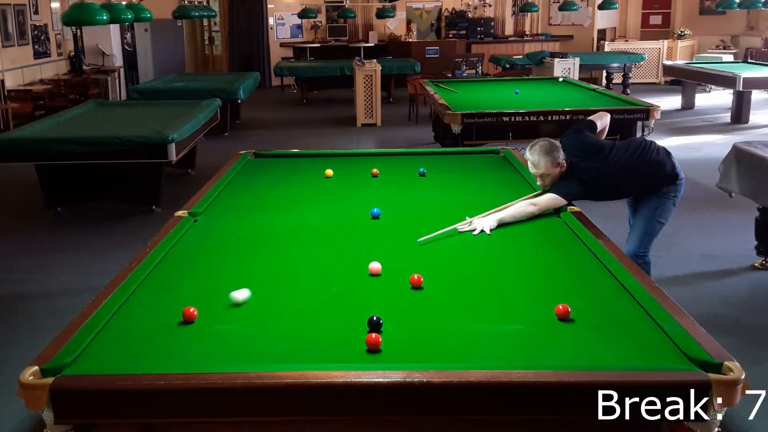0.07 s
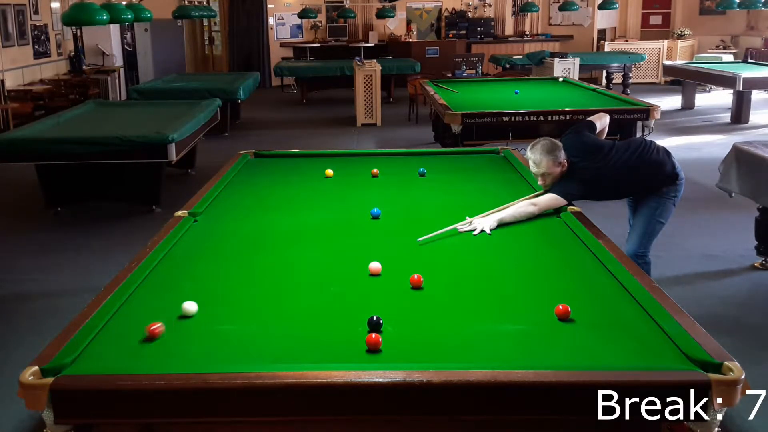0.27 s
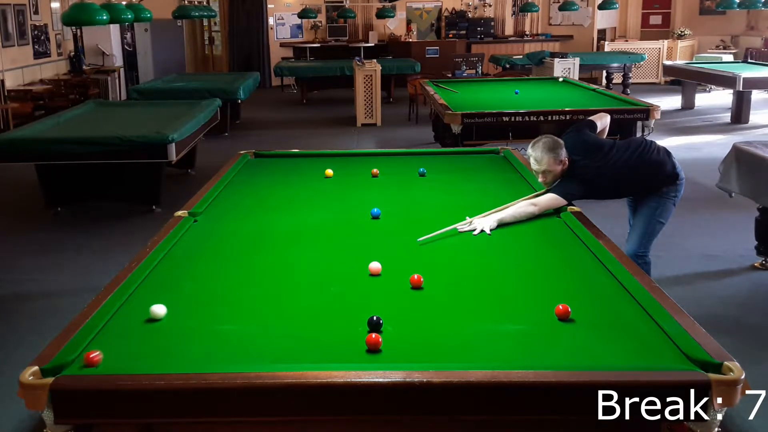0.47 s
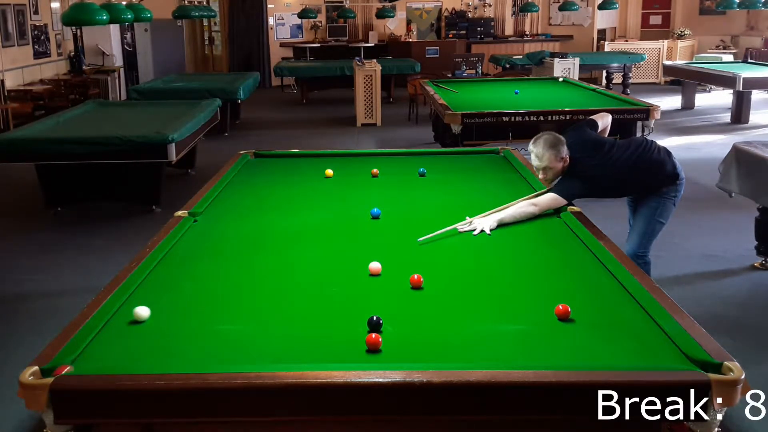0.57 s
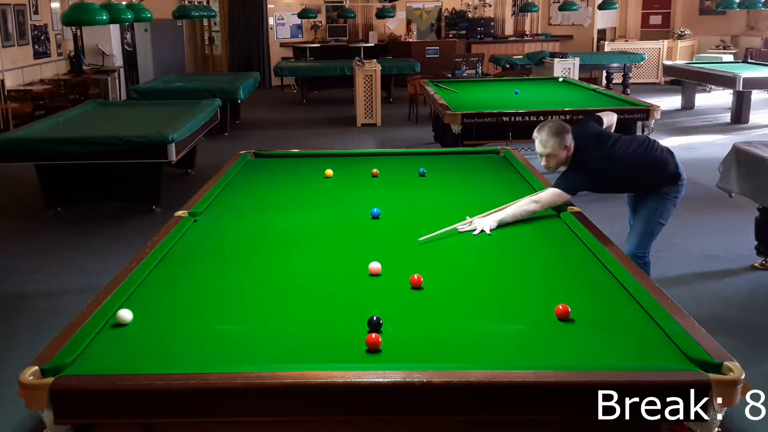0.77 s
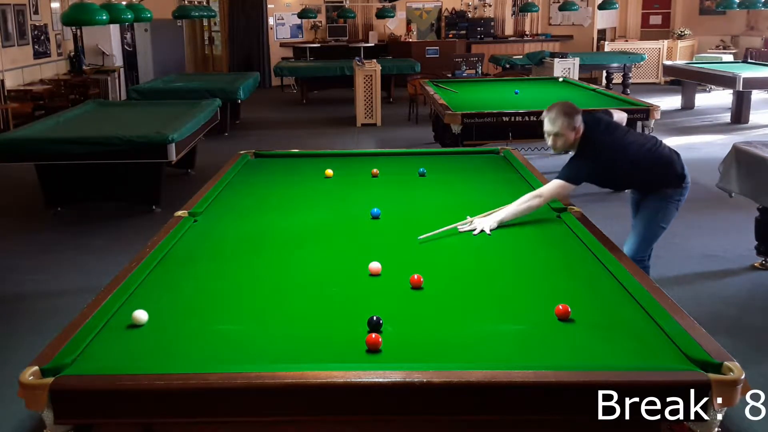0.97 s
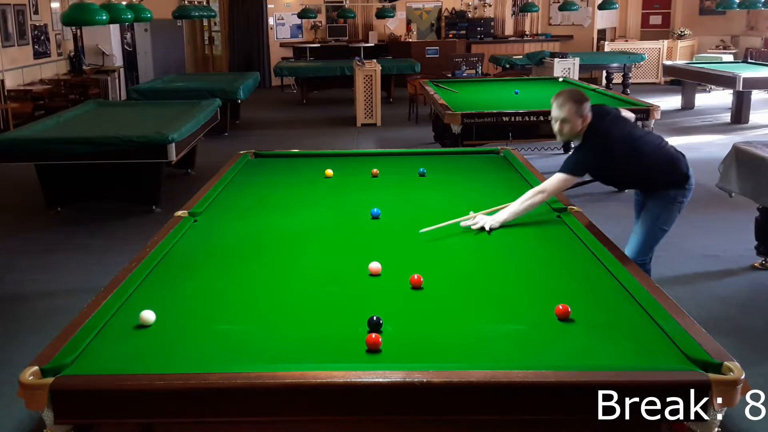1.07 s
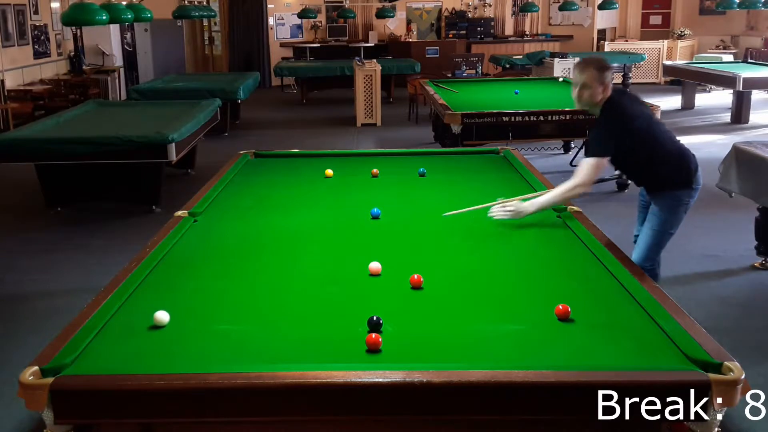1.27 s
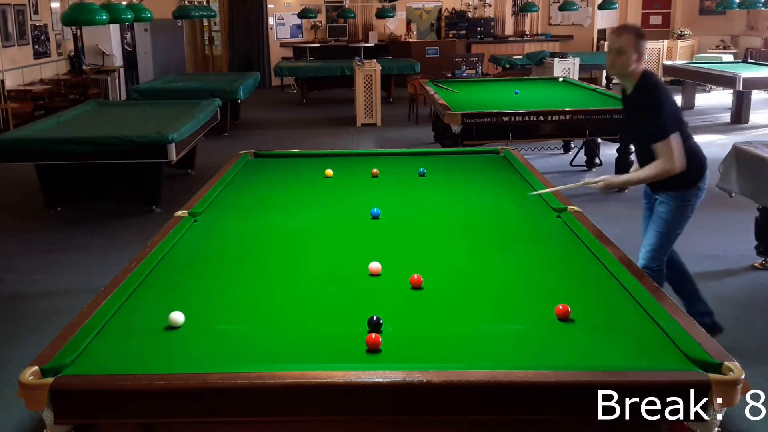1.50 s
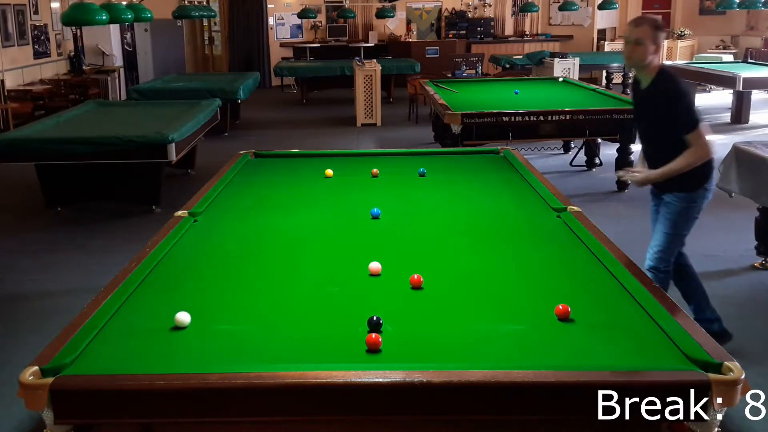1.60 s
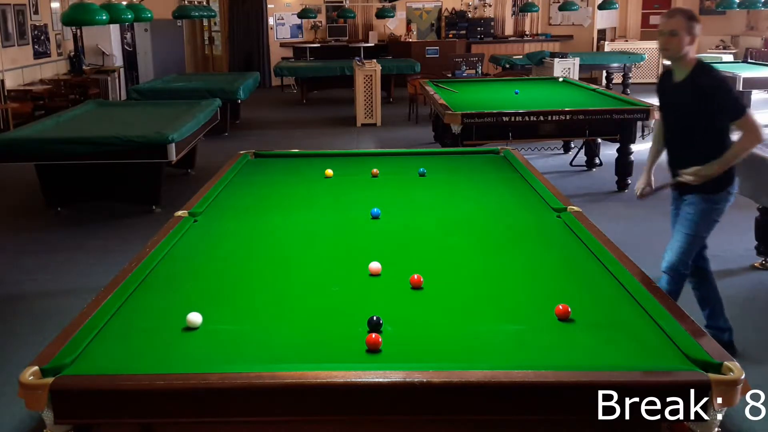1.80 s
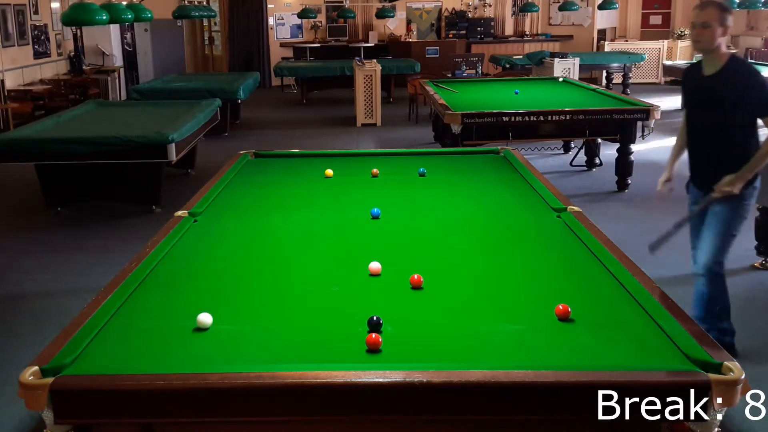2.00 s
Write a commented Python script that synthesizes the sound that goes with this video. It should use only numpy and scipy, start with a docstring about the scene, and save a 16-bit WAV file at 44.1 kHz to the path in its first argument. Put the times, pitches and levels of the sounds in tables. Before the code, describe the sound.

Two snooker balls meet with a hard click close by, echoing through a large hall. After a low rumble, one knocks into a pocket and its fittings rattle. Faint scuffs follow over light hiss and a fan.

```python
"""The fading reverberation of a cue stroke fills a large, quiet billiard hall, over air, hiss and a fan.
Heard from the foot of the snooker table, the cue ball clicks against a red; the balls rumble on the slate
and thump the bed and cushion. The red drops into the corner pocket, where the impact rattles the metal
fittings and excites the modes of the frame. Near surfaces and far walls reflect both impacts.
Last come soft scuffs as the player steps back."""
import sys
import numpy as np
from scipy import signal
from scipy.fft import rfft, irfft
from scipy.io import wavfile

SR = 44100
rng = np.random.default_rng(int(sys.argv[2]) if len(sys.argv) > 2 else 0)


def log_audio(samples):
    """Write samples as a 16-bit WAV file to the path given in sys.argv[1]."""
    # one column per channel
    frames = np.atleast_2d(samples).T
    # limit to full scale, then quantise
    limited = np.clip(frames, -1, 1)
    pcm = np.round(limited * 32767).astype(np.int16)
    wavfile.write(sys.argv[1], SR, pcm)


N = 90404

# likeness of a diffuse field at the two ears (frequency [Hz], correlation [-1 to 1])
EAR_CORRELATION = [(60, .75), (250, 0.69), (500, 0.55), (1000, 0.056), (2200, 0.11), (4000, -0.075),
                   (8000, 0.017)]
# spectra of the cue stroke's tail, the air, the hiss and the fan (frequency [Hz], density [dB])
CUE_SPECTRUM = [(90, -13), (200, -1), (350, -3.5), (750, 1.5), (1300, -4), (2500, -7.5), (3500, -17.5),
                (6000, -41)]
AIR_SPECTRUM = [(20, -3), (45, -15.5), (80, -3), (125, 2), (160, 1.5), (200, 5), (300, -7), (600, -4.5),
                (1200, -6.5), (2400, -9.5), (4000, -16.5), (8000, -39)]
HISS_SPECTRUM = [(2000, 4), (5000, -1.5), (7500, -6), (9500, -9.5), (12000, 0.5), (15500, -1)]
FAN_SPECTRUM = [(100, -7), (300, -1), (700, 0), (1300, -.5), (2400, -4), (3500, -12), (6000, -26)]
# slow drift of the hiss (time [s], level [dB])
HISS_ENVELOPE = [(0, -68.5), (.4, -66.5), (1.1, -67), (1.5, -69.5), (2.05, -71.5)]
# spectrum of the ball-on-ball click (frequency [Hz], relative level [dB])
CLICK_SPECTRUM = [(100, -40), (400, -34), (650, -24), (1000, -12), (1600, -4), (2500, 1), (3100, -5.5),
                  (4300, -20), (5500, -38.5), (9000, -47.5), (15000, -51)]
# reflections off lamp, ceiling and rails (delay [ms], gain [dB], right-ear lag [ms], left minus right [dB])
CLICK_ECHOES = [(3.5, -15, 0.15, -4), (5.1, -24, -0.21, 22), (7.5, -9, 0.42, 4), (8.53, -4.8, 0, 0),
                (10.0, -20, 0.13, -31), (11.4, -13.5, -0.053, 10)]
# colour of the hall's reverberation (frequency [Hz], relative level [dB])
HALL_SPECTRUM = [(300, 3), (1000, .5), (2200, 1.5), (3200, -0.5), (4500, 0.5), (7000, 1), (15000, 1)]
# reverberation time of the hall (frequency [Hz], T60 [s])
HALL_DECAY = [(150, 3.5), (600, 2.76), (1300, 1.87), (2200, 1.56), (3200, 1.39), (4500, 1.0), (8000, 0.51),
              (15000, 0.38)]
# rumble of balls on the slate (frequency [Hz], density [dB])
ROLL_SPECTRUM = [(40, -27), (90, -14), (125, 0), (170, -4.5), (260, -6), (500, -8.5), (1000, -34),
                 (3000, -60)]
# resonances struck in the bed and cushions (time [s], frequency [Hz], level [dB], T60 [s])
TABLE_THUMPS = [(0.326, 129, -62, 0.28), (.44, 125, -57, 0.13), (.97, 196.8, -57.5, 0.64),
                (1.275, 191, -62, 0.25)]
# spectrum of the knock in the pocket (frequency [Hz], relative level [dB])
DROP_SPECTRUM = [(100, -24), (300, -15), (600, -16), (1000, -8), (1700, -0.5), (2500, -1), (3200, -5),
                 (4200, -18), (5500, -31), (9000, -32), (15000, -40)]
# rattle of the pocket's metal fittings (frequency [Hz], density [dB])
RATTLE_SPECTRUM = [(1000, -20), (3500, -9), (5500, -4.5), (6800, -5.5), (7900, 2), (9500, -8),
                   (12000, -1.5), (15500, -7.5)]
# modes of the pocket and table frame (frequency [Hz], relative level [dB], T60 [s])
FRAME_MODES = [(267.8, 0.5, 0.3), (435, 3.5, 0.15), (753, -11, 0.21), (902, -2, 0.28), (995, 14, 0.097),
               (1090, -4.5, 0.39)]
# friction of shoes and clothing (frequency [Hz], density [dB])
SCUFF_SPECTRUM = [(100, 9), (280, -3), (600, -8), (2200, 4), (4000, -5), (7000, -26), (14000, -13)]
# the player's movements (time [s], width [s], level [dB])
SCUFF_EVENTS = [(1.515, 0.0096, -69), (1.617, 0.025, -64), (1.98, 0.1, -74.5)]

CLICK_S, DROP_S = 0.2379, 0.8574  # ball meets ball; the red lands in the pocket


def amp(db):
    """Amplitude grows tenfold for every 20 dB."""
    return 10 ** (np.asarray(db) / 20)


def along(points, hz):
    """Interpolation on a logarithmic frequency axis."""
    f, v = np.transpose(points)
    return np.interp(np.log(hz + 1), np.log(f + 1), v)


def since(s):
    """Causal time: seconds since s, zero before it."""
    return np.maximum(np.arange(N) / SR - s, 0)


def grid():
    """Frequencies of the zero-padded Fourier transform."""
    return np.fft.rfftfreq(2 * N, 1 / SR)


def noise(spectrum=None):
    """A diffuse field of rms 1: long waves reach both ears alike."""
    hz = grid()
    angle = np.arccos(np.clip(along(EAR_CORRELATION, hz), -1, 1)) / 2
    gain = amp(along(spectrum, hz)) if spectrum else 1
    white = rfft(rng.standard_normal((2, 2 * N)))
    mid, side = irfft(white * gain * [np.cos(angle), np.sin(angle)])[:, :N]
    pair = np.array([mid + side, mid - side])
    return pair / pair.std()


def cue_tail(db=-54, t60=2.75):
    """Absorption makes the cue stroke's reverberation decay exponentially."""
    return noise(CUE_SPECTRUM) * amp(db - 60 * since(0) / t60)


def background(air_db=-69):
    """Broadband noise: a steady murmur of air and a drifting microphone hiss."""
    hiss_db = np.interp(since(0), *np.transpose(HISS_ENVELOPE))
    return noise(AIR_SPECTRUM) * amp(air_db) + noise(HISS_SPECTRUM) * amp(hiss_db)


def fan(turn_hz=32.8, crest_s=1.6665, db=-66):
    """Amplitude modulation: each turn of a ventilation fan gives one soft puff of noise."""
    puff = (1 + np.cos(2 * np.pi * turn_hz * (since(0) - crest_s))) / 2
    return noise(FAN_SPECTRUM) * amp(db) * puff


def impact(spectrum):
    """A brief contact radiates a minimum-phase pulse, here of peak 1."""
    cepstrum = irfft(np.log(amp(along(spectrum, grid()))))
    cepstrum[1:N] *= 2  # folding the cepstrum makes the pulse causal
    cepstrum[N + 1:] = 0
    pulse = irfft(np.exp(rfft(cepstrum)))[:N]
    return pulse / np.abs(pulse).max()


def arrive(x, s, db, lag_ms=0, pan_db=0):
    """Interaural time and level differences give a direction to a sound arriving at time s."""
    ear = np.array([[-1], [1]]) / 2
    delay = s + ear * lag_ms / 1000
    delayed = irfft(rfft(x, 2 * N) * np.exp(-2j * np.pi * grid() * delay))[:, :N]
    return delayed * amp(db - ear * pan_db)


def ball_on_ball(db=-9.5):
    """An elastic collision gives one hard, ringless click, followed by its reflections."""
    pulse = impact(CLICK_SPECTRUM)
    source = arrive(pulse, CLICK_S, db)
    direct = arrive(pulse, CLICK_S, db, lag_ms=0.096, pan_db=1.5)
    echoes = sum(arrive(pulse, CLICK_S + ms / 1000, db + gain, lag, pan)
                 for ms, gain, lag, pan in CLICK_ECHOES)
    near = near_walls(source, scatter_db=-33, t60=0.14, cluster_db=-33.5, cluster_s=0.026, width_s=0.0056)
    return direct + echoes + near + hall(source, early_db=-39.5, late_db=-35, far_s=0.12)


def convolve(x, response):
    """A linear room convolves the sound with each ear's impulse response."""
    return signal.fftconvolve(x, response, axes=1)[:, :N]


def near_walls(x, scatter_db, t60, cluster_db, cluster_s, width_s):
    """Early reflections: furniture scatters the sound and the nearest walls return a cluster of echoes."""
    t = since(0)
    scatter = amp(scatter_db - 60 * t / t60) * (1 - np.exp(-t / 0.0019))
    cluster = amp(cluster_db) * np.exp(-((t - cluster_s) / width_s) ** 2 / 2)
    return convolve(x, noise() * np.hypot(scatter, cluster))


def hall(x, early_db, late_db, far_s, far_rise_s=0.0099, bloom_db=2, bloom_s=0.19):
    """Reverberation swells when the far walls answer; absorption takes the treble first."""
    hz, s, spectra = signal.stft(noise(HALL_SPECTRUM), SR, nperseg=256)
    decay = amp(-60 * s / along(HALL_DECAY, hz)[:, None])
    tail = signal.istft(spectra * decay, SR, nperseg=256)[1][:, :N]
    t = since(0)
    swell = (1 + np.tanh((t - far_s) / far_rise_s / 2)) / 2
    excess_db = bloom_db * np.exp(-since(far_s) / bloom_s)
    gain = amp(early_db) * (1 - swell) + amp(late_db + excess_db) * swell
    onset = 1 - np.exp(-t / 0.009)
    return convolve(x, tail * gain * onset)


def rolling(db=-67, t60=7.5):
    """Rolling contact excites a faint rumble in the slate, fading as the balls slow."""
    t = since(CLICK_S)
    return noise(ROLL_SPECTRUM) * amp(db - 60 * t / t60) * (1 - np.exp(-t / 0.01))


def mode(t, hz, db, t60, rise_s):
    """A damped resonance builds up, then decays exponentially."""
    envelope = amp(db - 60 * t / t60) * (1 - np.exp(-(t / rise_s) ** 2))
    return envelope * np.sin(2 * np.pi * (hz * t + rng.random()))


def thumps():
    """Balls that skip or meet the cushion each excite a low, damped mode of the table."""
    return sum(mode(since(s), hz, db, t60, rise_s=0.012) for s, hz, db, t60 in TABLE_THUMPS)


def jaw_graze(s=0.852, width_s=0.004, db=-55):
    """Friction gives a puff of noise as the red grazes the pocket's jaw."""
    return noise(DROP_SPECTRUM) * amp(db) * np.exp(-((since(0) - s) / width_s) ** 2)


def pocket(db=-21.5, frame_db=-43):
    """Impact excitation: the red knocks below the rail, rattling the fittings and ringing the frame."""
    pulse = impact(DROP_SPECTRUM)
    source = arrive(pulse, DROP_S, db)
    direct = arrive(pulse, DROP_S, db, lag_ms=0.23, pan_db=2.5)
    near = near_walls(source, scatter_db=-21.5, t60=0.28,
                      cluster_db=-26.5, cluster_s=0.033, width_s=0.0059)
    fittings = rattle(DROP_S, db=-48, t60=0.084, hold_s=0.026)
    ring = sum(mode(since(DROP_S), hz, frame_db + level, t60, rise_s=0.028)
               for hz, level, t60 in FRAME_MODES)
    tail = hall(source + amp(-7.5) * fittings + amp(-17) * ring, early_db=-34, late_db=-31, far_s=0.15)
    return direct + near + fittings + ring + tail


def rattle(s, db, t60, hold_s=0):
    """Rapid contacts of the metal fittings merge into bright, decaying noise."""
    return noise(RATTLE_SPECTRUM) * (since(s) > 0) * amp(db - 60 * since(s + hold_s) / t60)


def settle():
    """The ball shifts once more in the pocket, exciting a much fainter rattle."""
    return rattle(s=0.97, db=-67, t60=0.17)


def scuffs():
    """Friction of shoes and clothing makes soft swells of noise."""
    t = since(0)
    envelope = sum(amp(db) * np.exp(-((t - s) / width) ** 2 / 2) for s, width, db in SCUFF_EVENTS)
    return noise(SCUFF_SPECTRUM) * envelope


def scene():
    """Superposition: the pressures of all sources add."""
    ambience = cue_tail() + background() + fan()
    shot = ball_on_ball() + rolling() + thumps() + jaw_graze() + pocket() + settle()
    return ambience + shot + scuffs()


def record(dry, top_hz=16050):
    """An ideal low-pass filter removes everything above the band limit."""
    return irfft(rfft(dry, 2 * N) * (grid() < top_hz))[:, :N]


dry = scene()
out = record(dry)
log_audio(out)
```